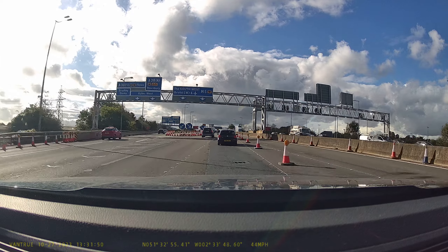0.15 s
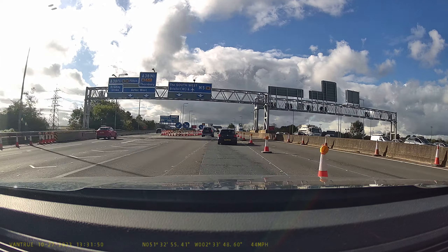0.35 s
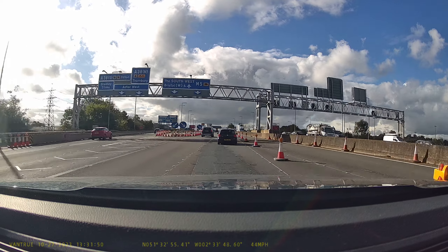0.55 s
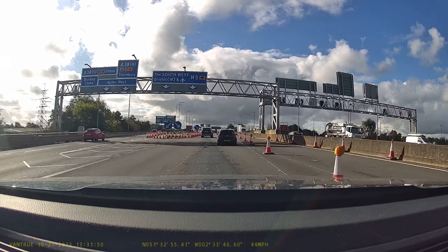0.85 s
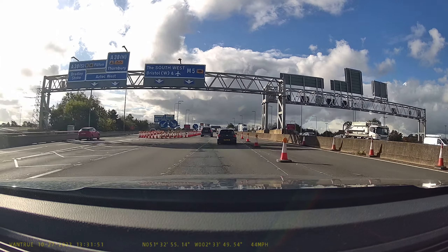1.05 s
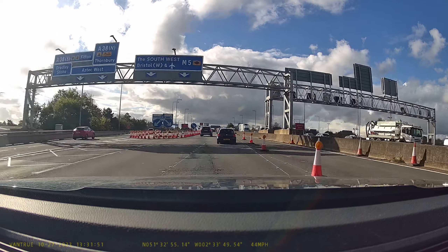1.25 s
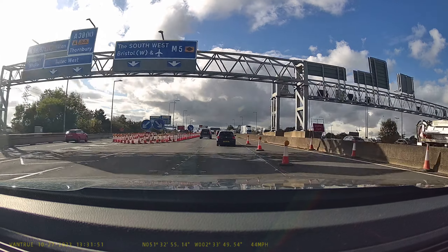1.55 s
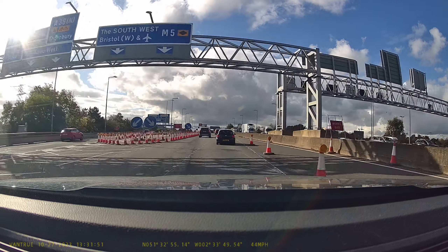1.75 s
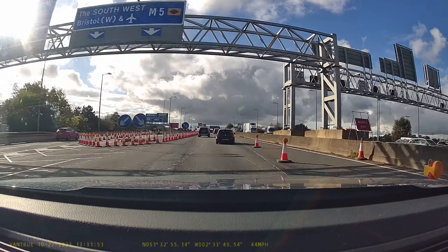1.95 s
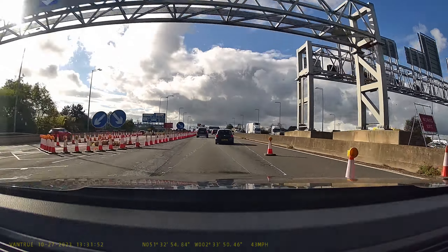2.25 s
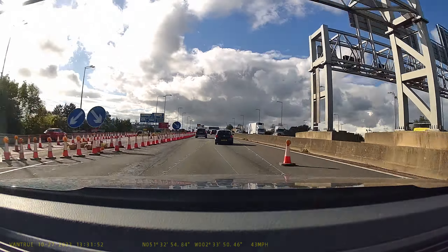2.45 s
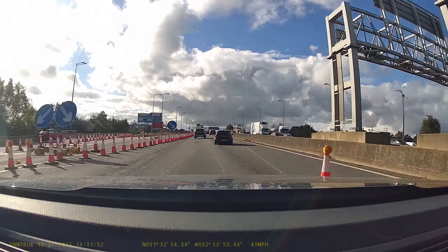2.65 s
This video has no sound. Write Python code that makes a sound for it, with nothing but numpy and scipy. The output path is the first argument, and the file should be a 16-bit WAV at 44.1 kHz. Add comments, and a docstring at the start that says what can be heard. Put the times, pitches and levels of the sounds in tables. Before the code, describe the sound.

Steady, booming road noise is heard from a microphone at the windscreen inside a moving car. Muffled tyre roar, faint engine hum and light hiss continue throughout, while soft bumps pass underneath and the rumble swells, then settles.

```python
"""Car cabin on the motorway

Microphone at the windscreen, inside a cruising car. The road shakes the body and booms in the cabin's
resonances, swelling over a rough stretch near 2 s, with soft thumps where the wheels meet bumps.
Below, the tyres drone through the suspension; just outside, their tread roars dully through the glass.
The engine hums faintly, and a thin steady hiss lies on top."""
import sys
import numpy as np
from scipy.fft import rfft, irfft, next_fast_len
from scipy.io import wavfile
from scipy.ndimage import map_coordinates

SR = 44100
rng = np.random.default_rng(int(sys.argv[2]) if len(sys.argv) > 2 else 0)


def waveform_to_disk(signal):
    """Save audio, clipped to [-1, 1], as 16-bit WAV at the path in sys.argv[1]."""
    frames = np.transpose(np.atleast_2d(signal))
    scaled = np.clip(frames, -1, 1) * 32767
    samples = np.round(scaled).astype(np.int16)
    wavfile.write(sys.argv[1], SR, samples)


N = 123479


def amp(db):
    """Decibels to gain."""
    return 10 ** (np.asarray(db) / 20)


def curve(rows):
    """Straight lines through (time [s], value) points, one value per sample."""
    return np.interp(np.arange(N) / SR, *np.transpose(rows))


def wobble(knots_per_s):
    """A smooth random curve that swings by about 1."""
    return map_coordinates(rng.standard_normal(256), [np.arange(N) * knots_per_s / SR], mode="wrap")


def filtered(x, response):
    """x through a filter whose gain is response(hz)."""
    size = next_fast_len(N + SR // 2)
    return irfft(rfft(x, size) * response(np.fft.rfftfreq(size, 1 / SR)), size)[:N]


def rush(spectrum, resonances=()):
    """Noise of rms 1 with a broad colour, lifted at each resonance."""
    def colour(hz):
        points_hz, points_db = np.transpose(spectrum)
        broad_db = np.interp(np.log(hz + 1), np.log(points_hz + 1), points_db)
        lift_db = sum(lift / (1 + (2 * (hz - centre) / width) ** 2) for centre, width, lift in resonances)
        return amp(broad_db + lift_db)

    noise = filtered(rng.standard_normal(N), colour)
    return noise / np.sqrt(np.mean(noise ** 2))


# boom of the body, all around the microphone (frequency [Hz], relative level [dB])
BOOM_SPECTRUM = [(15, -29), (27, -24), (38, 2), (47, -9), (70, -3.5), (89, -7.5), (115, -4.5), (140, -9),
                 (170, -9), (230, -24), (500, -56), (2000, -98)]
# resonances of the cabin air (frequency [Hz], width [Hz], lift [dB])
CABIN_MODES = [(71.1, 7.6, 7), (113.6, 20, 6.5)]
# boom as the road's roughness varies (time [s], level [dB])
BOOM_LEVEL = [(0, -40), (.13, -41.5), (.25, -44), (.5, -43), (.67, -41), (.85, -40), (.95, -43),
              (1.15, -45.5), (1.28, -42), (1.48, -43.5), (1.65, -44.5), (1.8, -41), (1.96, -36),
              (2.06, -37), (2.25, -38.5), (2.5, -42), (2.8, -43.5)]

def road_boom():
    """The road's texture shakes the body and booms in the cabin."""
    flutter_db = 0.6 * wobble(knots_per_s=14)
    return rush(BOOM_SPECTRUM, CABIN_MODES) * amp(curve(BOOM_LEVEL) + flutter_db)


# tyre drone from below the cabin (frequency [Hz], relative level [dB])
DRONE_SPECTRUM = [(60, -33), (130, -14.5), (165, -0.5), (205, 1), (228, -6.5), (270, -6), (320, -9),
                  (375, -13), (470, -14.5), (560, -27), (900, -41.5), (2000, -79)]
# resonances of tyre cavities and suspension (frequency [Hz], width [Hz], lift [dB])
WHEEL_MODES = [(188, 19, 2.5), (241.2, 9.1, 5.5), (301, 18, 6), (435, 40, 2.5)]
# drone at the microphone (time [s], level [dB])
TYRE_DRONE_LEVEL = [(0, -47.5), (.3, -48), (.7, -46.5), (1.05, -47), (1.35, -47.5), (1.6, -49),
                    (1.8, -44.5), (1.94, -41), (2.1, -42.5), (2.2, -46.5), (2.4, -45), (2.6, -49),
                    (2.8, -45)]

def tyre_drone():
    """The rolling tyres drone through the suspension, most on the rough stretch."""
    return rush(DRONE_SPECTRUM, WHEEL_MODES) * amp(curve(TYRE_DRONE_LEVEL))


# tread roar from behind the glass (frequency [Hz], relative level [dB])
ROAR_SPECTRUM = [(150, -47), (330, -7.5), (460, 2), (550, -1.5), (700, -4), (870, -7.5), (1160, -8.5),
                 (1230, -12.5), (1380, -19.5), (1800, -29.5), (3000, -35), (8000, -72)]
# resonances of the panels (frequency [Hz], width [Hz], lift [dB])
PANEL_MODES = [(611, 7.5, 7), (711, 25, 4.5), (824, 43, 2.5), (952, 15, 5), (1040, 40, 3), (1154, 25, 1)]
# roar at the microphone (time [s], level [dB])
ROAR_LEVEL = [(0, -58), (.5, -58.5), (1.1, -58), (1.4, -58.5), (1.75, -56.5), (2.1, -58), (2.45, -59),
              (2.8, -58)]

def tread_roar():
    """The tread roars on the road just outside, muffled by glass and panels."""
    flutter_db = 0.5 * wobble(knots_per_s=13.03)
    return rush(ROAR_SPECTRUM, PANEL_MODES) * amp(curve(ROAR_LEVEL) + flutter_db)


def engine_hum(firing_hz=74.5, drift=0.014, rms_db=-55.5):
    """The engine hums faintly at its firing rate, drifting slightly in pitch."""
    hz = firing_hz * (1 + drift * wobble(knots_per_s=3.54))
    phase = 2 * np.pi * np.cumsum(hz) / SR
    return amp(rms_db) * np.sqrt(2) * np.sin(phase)


# hiss at the microphone (frequency [Hz], relative level [dB])
HISS_SPECTRUM = [(300, -13), (1500, 2.5), (2500, 0), (4500, -1.5), (7700, -3), (10000, -6.5), (12500, -9),
                 (15500, -9)]

def hiss(level_db=-68, db_per_roar_db=0.082):
    """A thin, even hiss that lifts very slightly with the tread roar."""
    roar_db = curve(ROAR_LEVEL)
    lift_db = db_per_roar_db * (roar_db - roar_db.mean())
    return rush(HISS_SPECTRUM) * amp(level_db + lift_db)


# bumps under the wheels, heard from inside (time [s], peak level [dB], pitch [Hz])
ROAD_BUMPS = [(.055, -34, 58), (.108, -33, 112), (.166, -29.5, 90), (0.429, -33, 95), (.655, -34, 122),
              (.72, -32, 80), (1.238, -30, 90), (1.293, -29, 99.5), (1.383, -34.5, 106), (1.56, -29, 85),
              (1.785, -29, 112), (1.937, -27.5, 80), (1.98, -22.5, 75), (2.008, -27.5, 100),
              (2.248, -27.5, 112)]

def bump_thumps(rise_s=0.0077, fall_s=0.0075):
    """Each bump, softened by tyre and springs, gives a low push that swings once or twice."""
    thumps = np.zeros(N)
    phases = rng.standard_normal(len(ROAD_BUMPS))
    for (peak_s, db, hz), phase in zip(ROAD_BUMPS, phases):
        t = np.arange(N) / SR - peak_s
        rise = np.exp(-(t / rise_s) ** 2)
        fall = np.exp(1 - np.hypot(t / fall_s, 1))  # rounded top, exponential tail
        thumps += amp(db) * np.where(t < 0, rise, fall) * np.cos(2 * np.pi * hz * t + phase)
    return thumps


def scene():
    """The cabin in mono, from just inside the windscreen."""
    return (road_boom() + tyre_drone() + tread_roar() + engine_hum() + hiss() + bump_thumps())[None]


def record(dry):
    """The microphone's channel cuts off steeply at its band limit."""
    top_hz = 15850
    low_pass = lambda hz: 1 / np.sqrt(1 + np.minimum(hz / top_hz, 2) ** 600)
    return filtered(dry[0], low_pass)[None]


dry = scene()
out = record(dry)
waveform_to_disk(out)
```